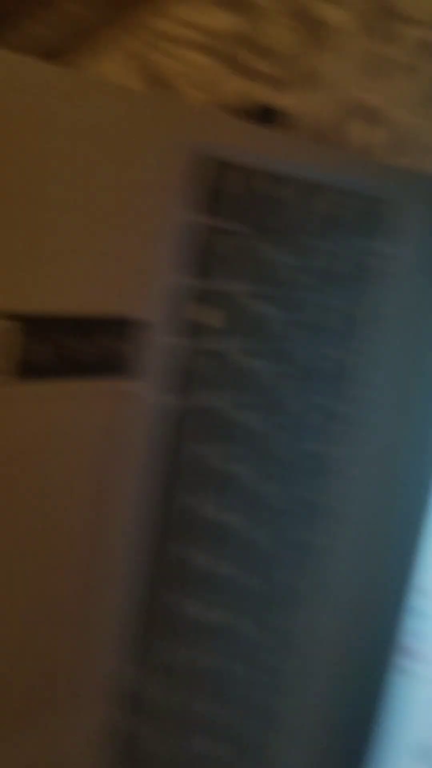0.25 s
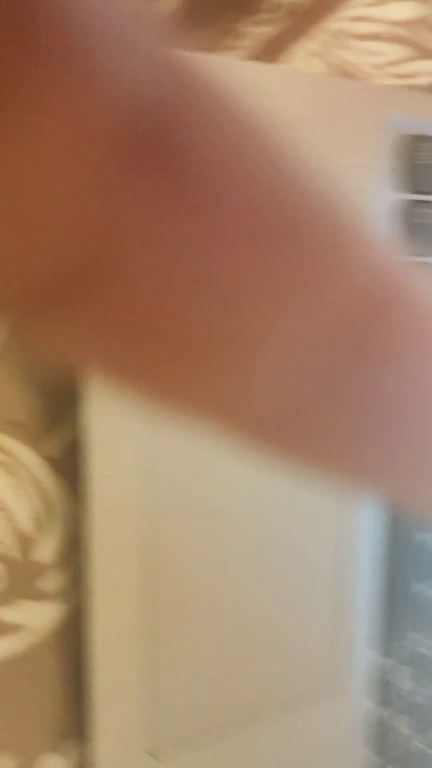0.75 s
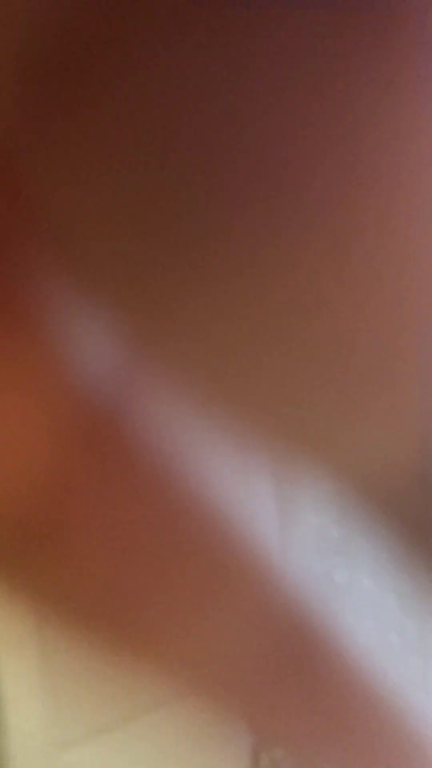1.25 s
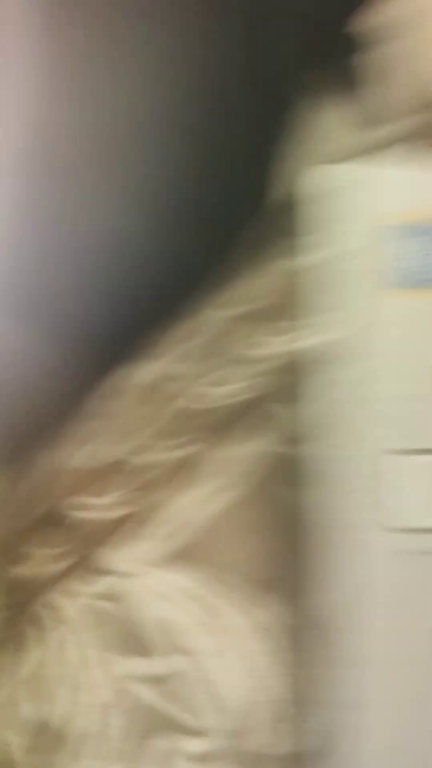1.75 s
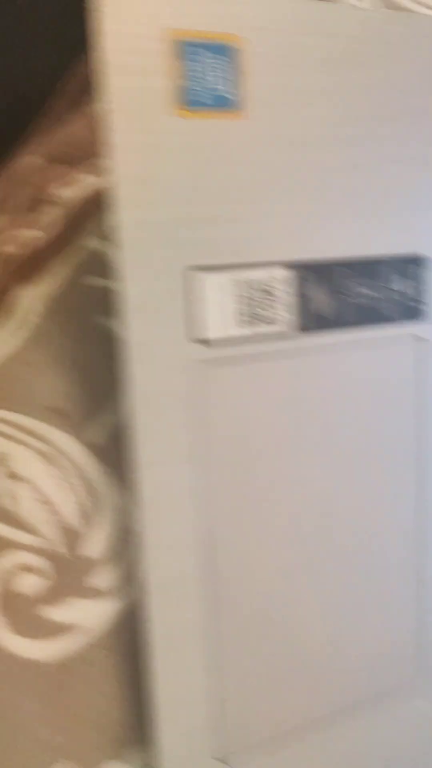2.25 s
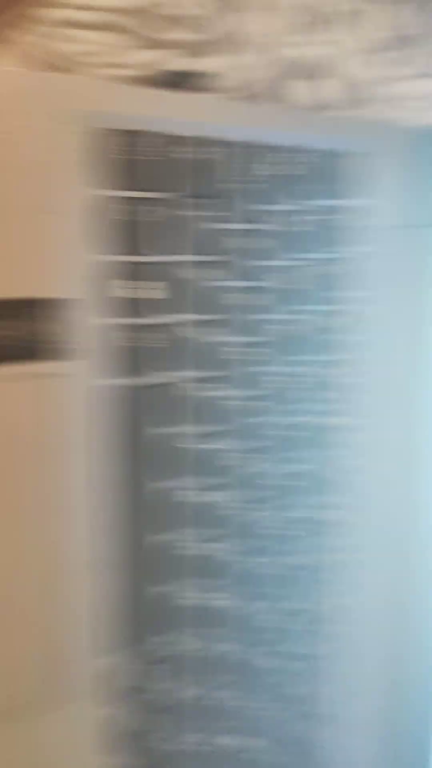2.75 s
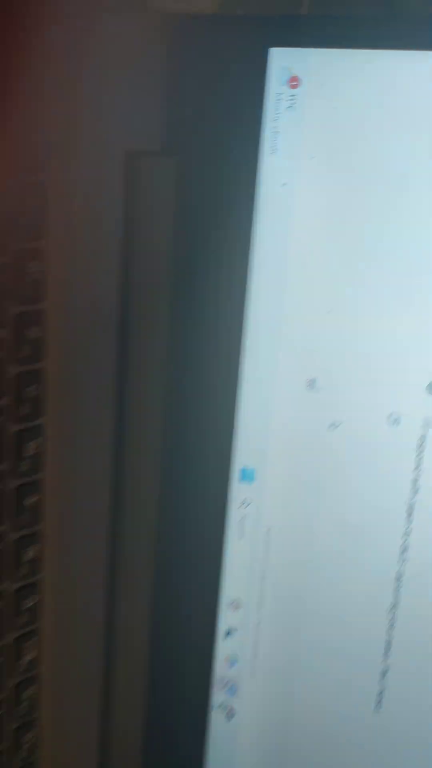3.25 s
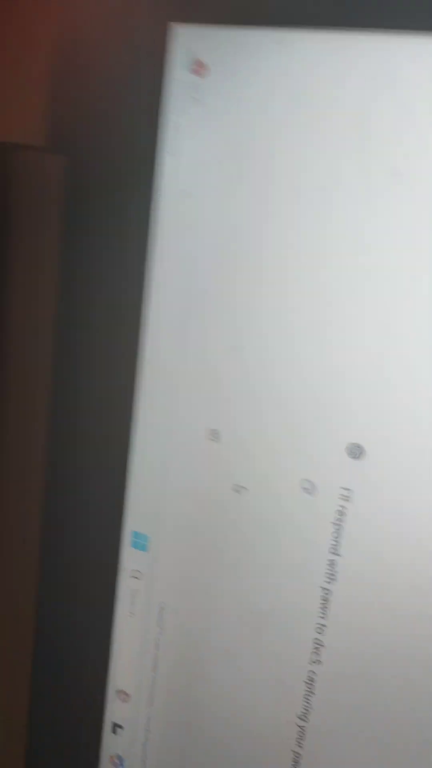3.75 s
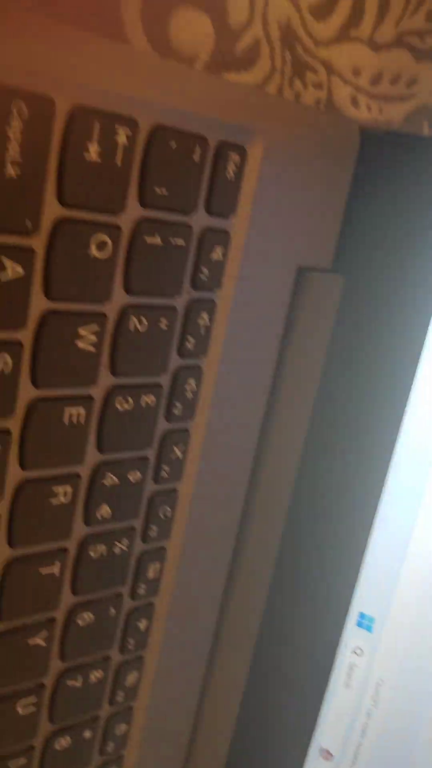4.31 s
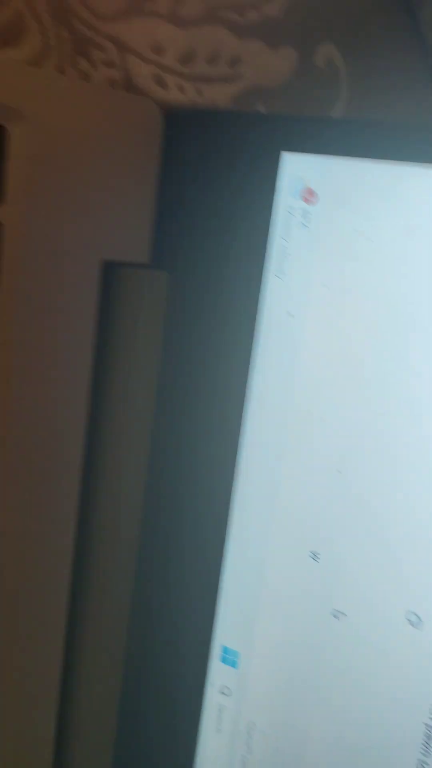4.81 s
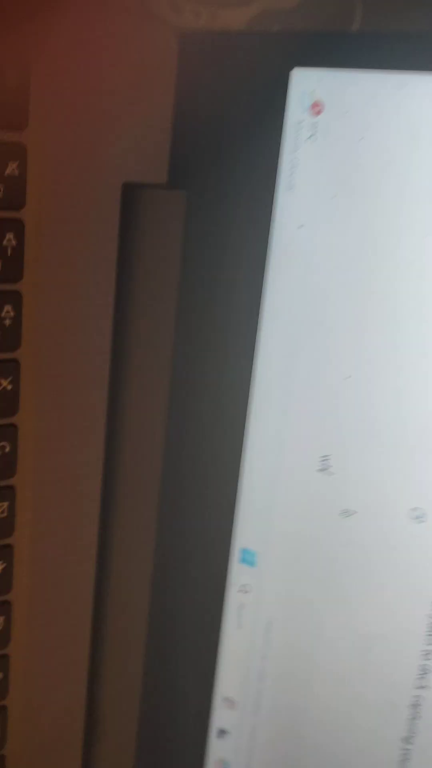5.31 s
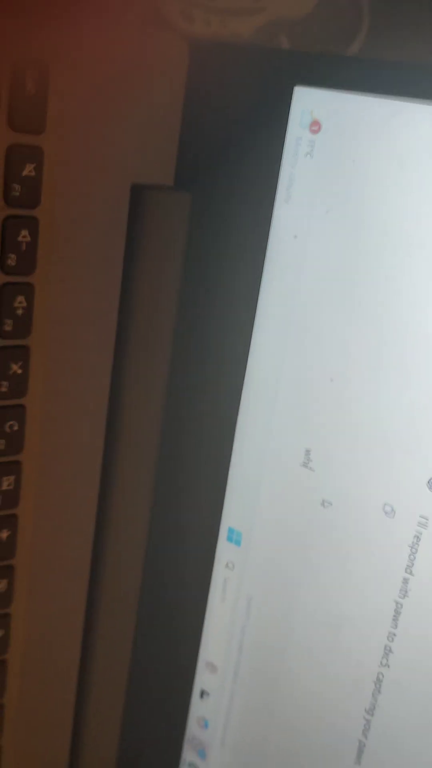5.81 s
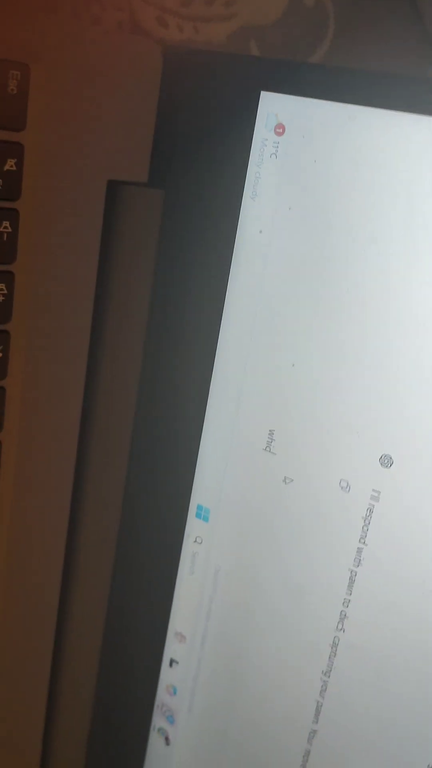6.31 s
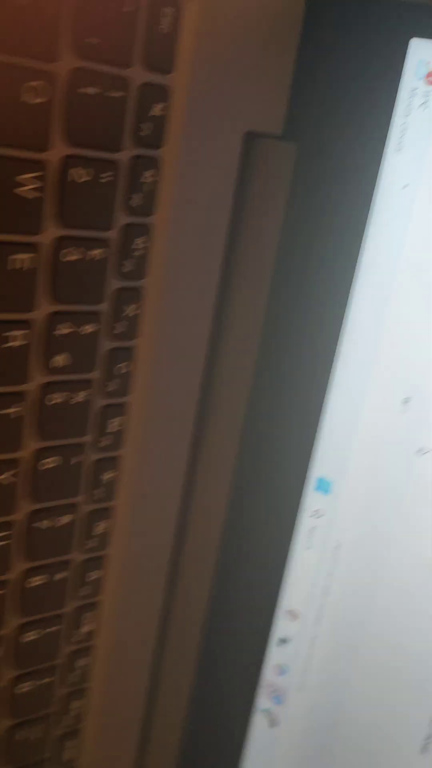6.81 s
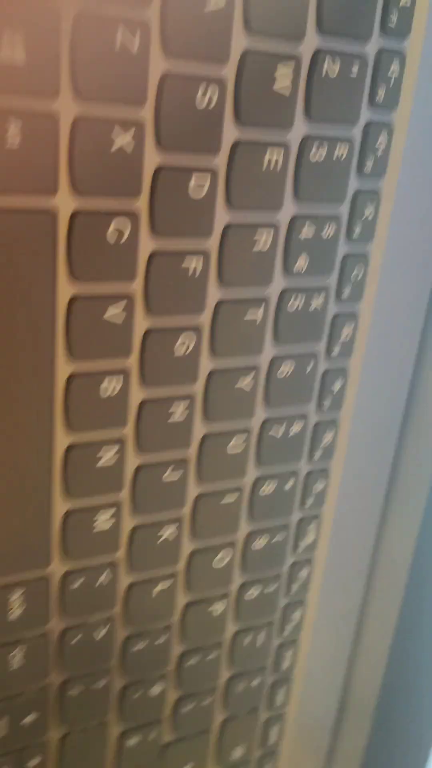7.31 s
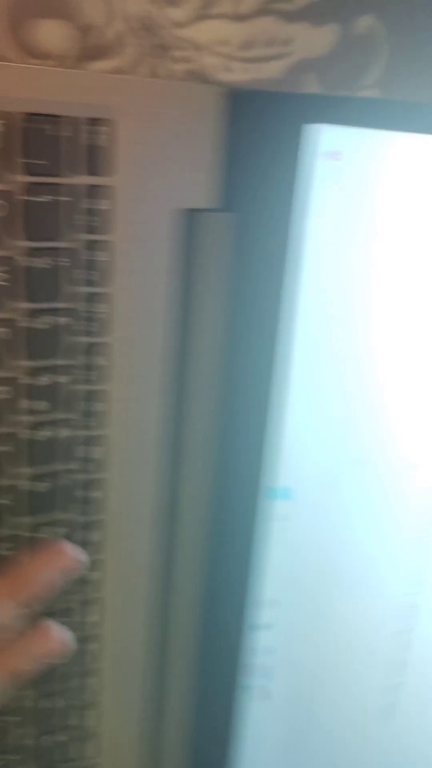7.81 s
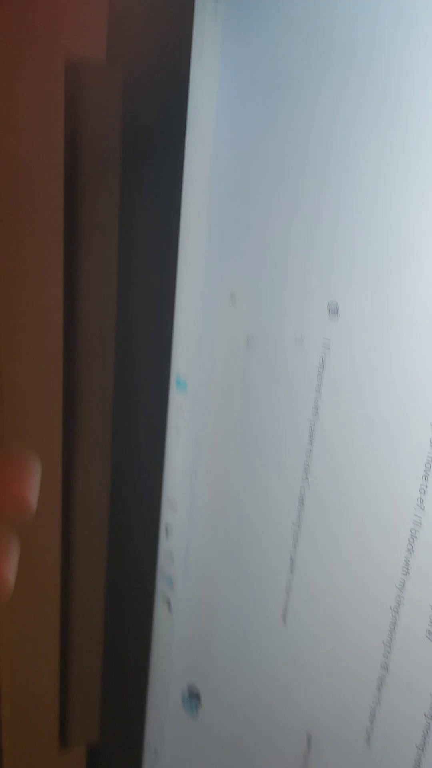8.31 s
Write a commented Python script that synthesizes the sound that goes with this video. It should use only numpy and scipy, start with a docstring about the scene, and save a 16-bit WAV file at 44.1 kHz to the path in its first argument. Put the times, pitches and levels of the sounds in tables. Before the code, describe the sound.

Fingers rub, snag and bump loudly against a handheld device, then sparse laptop keys click softly in a quiet room, ending with one hard stroke.

```python
"""Phone handling, then laptop typing

Fingers rub, snag and bump on a phone as it is brought round to a laptop in a quiet room. Then a few keys
are typed in short flurries, ending with one hard stroke. Skin is coloured stick-slip noise, snags are
sharp clicks and bumps are sagging low pushes; each key impact clicks in its plastic cap, clacks on the
deck and thuds through the chassis, and each release adds a falling thock."""
import sys
import numpy as np
from scipy import signal
from scipy.fft import rfft, irfft, next_fast_len
from scipy.io import wavfile

SR = 44100
rng = np.random.default_rng(int(sys.argv[2]) if len(sys.argv) > 2 else 0)


def inscribe(sig):
    """Save sig as 16-bit PCM at rate SR to the path in sys.argv[1].

    A 1-D sig is mono; a 2-D sig holds one channel per row.
    Samples are clipped to [-1, 1] before scaling.
    """
    pcm = np.round(np.clip(np.atleast_2d(sig).T, -1, 1) * 32767)
    wavfile.write(sys.argv[1], SR, pcm.astype(np.int16))


N = 377496
TIME = np.arange(N) / SR

# colour of a skin snag on the case: f/Hz, density/dB per Hz
SNAG_COLOUR = [(100, -37.5), (820, -30), (950, 3.5), (1500, 0), (2200, -2), (4200, -0.5), (5400, -19.5),
               (8500, -19), (11500, -29), (13500, -27.5), (16000, -37.5)]
# slips of a juddering, dragging finger: t/s
JUDDER_TIMES = [2.72, 2.783, 2.823, 2.846, 2.868, 2.891, 2.913, 2.928, 2.941]
# keystrokes: finger lands t/s, travel to the stop/s, held/s, then relative levels: landing click/dB,
# cap click at the stop/dB, deck clack/dB, release click/dB, release thock/dB; last, thock start f/Hz
KEYSTROKES = [(3.704, 0.0048, .13, -45, -40.5, -65, -46, -55.5, 607),
              (5.073, 0.0057, 0.065, -33, -36, -40, -41, -56, 650),
              (5.332, 0.0073, 0.069, -37, -47.5, -48.5, -39.5, -60, 600),
              (5.7853, .0057, 0.058, -30, -33.5, -37.5, -35, -53.5, 750),
              (6.520, 0.0034, .068, -31, -22, -20.5, -37.5, -46, 950),
              (6.658, .0068, 0.079, -34.5, -38, -39.5, -40.5, -43, 1087),
              (6.788, .01, .084, -41, -42.5, -51, -39, -41.5, 1210),
              (6.938, 0.0075, .083, -39.5, -34.5, -43, -41.5, -44, 1060),
              (7.098, 0.012, 0.069, -44, -37, -56.5, -43.5, -51, 940),
              (8.2033, .0046, .0605, -31, -14, -12.5, -34.5, -43.5, 565)]
LANDING_THUD_DB = -12  # a light finger hardly reaches the chassis; relative to its cap click


def gain_of(db):
    """Decibels to amplitude."""
    return 10 ** (np.asarray(db) / 20)


def evened(x):
    """Scales to rms 1."""
    return x / np.sqrt(np.mean(x ** 2) + 1e-20)


def add(mix, s, sound):
    """Mixes a sound in at time s, cut at the end of the mix."""
    part = mix[max(round(s * SR), 0):][:len(sound)]
    part += sound[:len(part)]


def colour(x, points, tilt_db=0):
    """Filters by a spectrum of (Hz, dB) points, tilted per octave above the second point."""
    f, db = np.transpose(points)
    octave = np.log2(np.fft.rfftfreq(len(x), 1 / SR) + 1)
    shape = np.interp(octave, np.log2(f), db)
    shape = shape + tilt_db * np.maximum(octave - np.log2(f[1]), 0)
    return irfft(rfft(x) * gain_of(shape), len(x))


def noise(points, size=N, tilt_db=0):
    """Coloured noise of rms 1."""
    white = rng.standard_normal(next_fast_len(size))
    return evened(colour(white, points, tilt_db)[:size])


def wobble(per_s):
    """Random drift of rms 1: straight lines between per_s chance values a second."""
    knots = rng.standard_normal(N // 16)
    return evened(np.interp(TIME * per_s, np.arange(len(knots)), knots))


def stick_slip(per_s, spread_db, smooth):
    """Countless tiny slips of uneven size over an even friction noise."""
    sizes = gain_of(spread_db * np.minimum(rng.exponential(1, N), 4))
    happens = rng.random(N) < per_s / SR
    slips = sizes * rng.choice([-1, 1], N) * happens
    return evened(evened(slips) + smooth * rng.standard_normal(N))


def background(floor_db=-72):
    """Faint steady room noise and a soft high hiss that drifts in level."""
    # room noise: f/Hz, density/dB per Hz
    floor_colour = [(20, -4), (45, 1), (90, 0), (150, -10), (300, -14.5), (500, -11), (750, -17),
                    (1000, -9), (2000, -17.5), (7000, -28), (12000, -21.5), (13500, -15.5), (16000, -19)]
    # hiss: f/Hz, density/dB per Hz
    hiss_colour = [(300, -23.5), (800, -14.5), (1100, -17.5), (2200, -16.5), (3200, -8.5), (4200, 1),
                   (5200, -3.5), (5900, -12), (6700, -26), (16000, -31.5)]
    # drift of the hiss: t/s, relative level/dB
    hiss_level = [(3.1, -63.5), (3.78, -64.5), (4.0, -71.5), (4.68, -70), (4.9, -65.5), (5.46, -74.5),
                  (5.78, -74), (5.91, -69.5), (6.59, -73.5), (6.72, -68.5), (7.29, -72.5), (8.35, -66.5),
                  (8.5, -70)]
    hiss_db = np.interp(TIME, *np.transpose(hiss_level)) + 3.5 + 0.75 * wobble(25)
    return gain_of(floor_db) * noise(floor_colour) + gain_of(hiss_db) * noise(hiss_colour)


def stroke_levels(rise_power=1.1, fall_power=2.4):
    """Rasp and skin hiss in dB: each stroke swells and eases off over the resting grip."""
    # the resting grip keeps rubbing: t/s, relative rasp level/dB, relative skin hiss level/dB
    grip = [(0, -55.5, -55), (.18, -60.5, -59.5), (.35, -67.5, -72), (.62, -59, -58), (.86, -58, -75),
            (1.3, -50.5, -61), (1.6, -56.5, -47.5), (1.7, -56.5, -55.5), (2.1, -66.5, -70.5),
            (2.45, -46.5, -68.5), (2.75, -52, -71), (2.98, -53.5, -69.5), (3.12, -73.5, -79)]
    # finger strokes: start t/s, rise/s, fall/s, then relative levels: rasp on the case/dB, skin hiss/dB
    strokes = [(0, 0.039, .05, -30, -43), (.056, .036, 0.042, -29, -31.5), (.39, .04, 0.065, -44, -52),
               (0.47, .011, .019, -19, -43), (.498, .014, .07, -22.5, -44.5),
               (.525, 0.063, .09, -20.5, -38.5), (.903, .017, .04, -30.5, -47),
               (0.931, 0.032, .06, -24, -36), (0.998, 0.11, .09, -45, -56), (1.17, 0.079, .13, -28, -39),
               (1.37, 0.029, .03, -35, -44), (1.41, 0.067, .07, -36.5, -51.5),
               (1.491, 0.034, .045, -23, -42), (1.53, 0.041, .06, -41.5, -38),
               (1.695, 0.06, .048, -38.5, -44.5), (1.8, 0.061, .17, -55, -52),
               (1.985, 0.029, .07, -52, -57), (2.126, .05, .07, -50, -47), (2.18, 0.027, .04, -33.5, -56.5),
               (2.235, 0.023, .07, -38, -54), (2.339, 0.012, .03, -26.5, -52),
               (2.37, 0.074, .1, -39.5, -66), (2.47, 0.042, .03, -38.5, -63),
               (2.536, 0.032, .14, -38.5, -60), (2.89, .07, .09, -45, -63.5)]
    s, *resting = np.transpose(grip)
    power = np.array([gain_of(np.interp(TIME, s, db, right=-120)) ** 2 for db in resting])
    for start, rise, fall, *levels in strokes:
        t = np.arange(0, rise + fall, 1 / SR)
        swell_in = np.sin(np.pi / 2 * np.minimum(t / rise, 1)) ** rise_power
        ease_off = np.cos(np.pi / 2 * np.clip((t - rise) / fall, 0, 1)) ** fall_power
        for layer, db in zip(power, levels):
            add(layer, start, (gain_of(db) * swell_in * ease_off) ** 2)
    return 10 * np.log10(power)


def sliding(rumble_db=-16, flutter_db=1.22, dull_below_db=24, bright_span_db=19, shimmer_db=2.5,
            catch_db=-8, catch_limit_db=-42):
    """Skin drags over the case: a thin grainy rasp with small catches, a wide hiss and a lumpy rumble."""
    # rasp on the case: f/Hz, density/dB per Hz
    rasp_colour = [(200, -47.5), (860, -44), (930, -4.5), (1050, 3.5), (1250, -3.5), (1500, -0.5),
                   (2200, -4), (3300, 0.5), (4400, -2), (5600, -24.5), (8000, -33), (16000, -42)]
    # skin hiss: f/Hz, density/dB per Hz
    skin_colour = [(40, -6), (300, -12), (830, -9.5), (1000, -1.5), (3000, -13.5), (5000, 3), (6800, -9),
                   (11000, -7), (14000, -8.5), (16000, -8)]
    rasp_db, skin_db = stroke_levels()

    slips = stick_slip(per_s=2600, spread_db=3.5, smooth=0.35)
    dull, bright = (evened(colour(slips, rasp_colour, tilt)) for tilt in (-5.5, 4))
    # the rasp brightens as the finger nears the microphone, where skin hiss gains on rasp
    nearness_db = skin_db - rasp_db + dull_below_db + shimmer_db * wobble(65)
    share = np.clip(nearness_db / bright_span_db, 0, 1)
    rasp = evened((1 - share) * dull + share * bright)
    rasp = rasp * gain_of(rasp_db + flutter_db * wobble(260) - 0.62)

    skin = evened(colour(stick_slip(per_s=6700, spread_db=0.0, smooth=1.8), skin_colour))
    skin = skin * gain_of(skin_db + 4.0 + 1.3 * wobble(90))

    rumble = noise([(20, -3.0), (55, 5), (110, -11), (220, -24), (500, -26), (3000, -78)])
    rumble = rumble * gain_of(rumble_db + 1.2 * wobble(25))
    rumble = rumble * gain_of(np.minimum(rasp_db, -37))  # follows the rasp up to a ceiling

    catches = evened(colour(stick_slip(per_s=45, spread_db=3.5, smooth=0), SNAG_COLOUR))
    catches = catches * gain_of(np.minimum(rasp_db, catch_limit_db) + catch_db)
    return rasp + catches + skin + rumble


def swishes(width_hz=200):
    """The palm brushes past: noise rings in the changing hollow under it, with a hiss on top."""
    # swishes: t/s, rise/s, fall/s, level/dB, hollow start f/Hz, glide/octaves per s, hiss over hollow/dB
    brushes = [(.003, 0.016, 0.021, -42.5, 561, -1, 6.5), (0.204, 0.012, 0.06, -47, 588, 1, 14),
               (1.245, 0.029, 0.04, -39, 327.5, -7, -20), (1.266, 0.051, 0.016, -34.5, 423.6, 10, -1),
               (1.473, 0.0035, 0.038, -43, 590, 4, -33)]
    # hiss on top: f/Hz, density/dB per Hz
    hiss_colour = [(400, -27.5), (1000, 0), (1800, -8), (2450, 7.5), (3100, -4), (4200, -4.5), (5000, 13.5),
                   (5800, 3.5), (6500, -5), (8000, -8), (11500, -8), (16000, -24)]
    out, t = np.zeros(N), np.arange(SR // 4) / SR
    smooth = signal.butter(2, width_hz / 2, fs=SR, output="sos")
    for s, rise, fall, db, hz, glide, hiss_db in brushes:
        # slow complex noise turned at the gliding pitch makes a band of noise around it
        turn = np.exp(2j * np.pi * np.cumsum(hz * 2 ** (glide * t)) / SR)
        slow = signal.sosfilt(smooth, [1, 1j] @ rng.standard_normal((2, len(t))))
        hollow = evened((turn * slow).real)
        swell = np.minimum(t / rise, 1) ** 2 * np.exp(-np.maximum(t - rise, 0) / fall)
        hiss = gain_of(hiss_db) * np.sqrt(swell) * noise(hiss_colour, len(t))
        add(out, s, gain_of(db) * swell * (hollow + hiss))
    return out


def snags(size=2048, scuff_db=-19, scuff_s=0.00092):
    """Single sharp slips, each smeared by a tiny scuff, carried through the case to the microphone."""
    # skin snags and case ticks: t/s, peak level/dB, tilt/dB per octave
    slips = [(.042, -10, 3.5), (.063, -6, 10.5), (0.4763, -6.5, -6), (.519, -1.5, 0.5), (.610, -4, -11.5),
             (.648, -16, -11), (.678, -18.5, 4.5), (0.686, -22.5, 1), (0.792, -35, 5), (.912, -11, .5),
             (.986, -8.5, 4), (1.010, -15.5, 1), (1.113, -22.5, -1.5), (1.186, -11, -2), (1.377, -19, 5),
             (1.434, -11.5, 7.5), (1.437, -15, -10), (1.508, -8, 1.5), (1.589, 3, 10.5), (2.194, -16.5, -3),
             (2.349, -11.5, -14.5), (2.394, -16.5, -4.5), (2.511, 4.5, -3), (2.655, -18, 0),
             (2.9139, -9, -8), (3.007, -21.5, 2.5), (3.577, -41, -3.5), (3.675, -36, -0.5),
             (3.775, -37.5, 2.5), (3.875, -38.5, 3), (4.699, -36, -6), (5.612, -42.5, 4)]
    # the tightening grip creaks in tiny high ticks: t/s, relative peak level/dB
    creaks = [(3.2184, -31), (3.3729, -32), (3.4177, -39), (3.4427, -34.5), (3.585, -23), (4.589, -44)]
    out, impulse = np.zeros(N), signal.unit_impulse(size, "mid")
    middle_s = size / 2 / SR
    scuff = gain_of(scuff_db - 2) * np.exp(-abs(np.arange(size) - size / 2) / SR / scuff_s)
    # each judder ticks 5 dB softer than the last
    judders = [(s, -23 - 5 * k, -5) for k, s in enumerate(JUDDER_TIMES)]
    for s, db, tilt in slips + judders:
        click = colour(impulse + scuff * rng.standard_normal(size), SNAG_COLOUR, tilt)
        add(out, s - middle_s, gain_of(db) * click / abs(click).max())
    tick = colour(impulse, [(1000, -20.0), (5000, -6), (12500, -22.5), (14500, 3), (16000, -2.0)])
    for s, db in creaks:
        add(out, s - middle_s, gain_of(db + 5.0) * tick / abs(tick).max())
    return out


def bumps(damping_per_hz=0.028, stiffening=0.56, soft_cycles=0.047):
    """Flesh meets the case: a cycle or two of low push that sags in pitch; tight bumps die fastest."""
    # soft bumps of the hand: t/s, peak level/dB, nominal f/Hz (the pitch sags from above it to below)
    hand_bumps = [(0.422, -32, 73), (.446, -39, 55), (.908, -39.5, 69), (1.029, -34.5, 152),
                  (1.175, -35.5, 61), (1.249, -30.5, 105), (1.347, -34.5, 65), (1.433, -28, 69),
                  (1.594, -33, 54.9), (1.726, -26, 75), (1.746, -19, 80), (1.907, -38.5, 58.3),
                  (2.037, -34, 58.5), (2.188, -31, 60.4), (2.246, -30.5, 76), (2.354, -33, 53.7),
                  (2.656, -30, 343), (3.005, -42.5, 100.6)]
    judder_db, judder_step_db, judder_hz, judder_sag_hz = -24.5, -1.22, 123, 2.9
    out, t = np.zeros(N), np.arange(SR // 8) / SR
    # each judder is weaker and a little lower than the last
    judders = [(s, judder_db + k * judder_step_db, judder_hz - k * judder_sag_hz)
               for k, s in enumerate(JUDDER_TIMES)]
    for s, db, hz in hand_bumps + judders:
        cycles = hz * t
        turns = .8 * cycles + stiffening * .5 * (1 - np.exp(-3 * cycles))
        fade = np.exp(-damping_per_hz * hz * cycles) * (1 - np.exp(-cycles / soft_cycles))
        push = -np.sin(2 * np.pi * turns) * fade
        add(out, s, gain_of(db) * push / abs(push).max())
    return out


def room(x, t60=0.3, gap_s=0.0064):
    """A small furnished room: a short diffuse tail of decaying noise after a gap."""
    t = np.arange(SR // 2) / SR
    tail = noise([(100, -4.5), (1000, -1.0), (5000, -9.5), (9000, -6), (16000, 10.0)], len(t))
    tail = tail * gain_of(-60 * t / t60) * np.clip(t / gap_s - 1, 0, 1)
    return signal.fftconvolve(x, tail / np.linalg.norm(tail))[:N]


def impacts():
    """A key is touched, hits its stop, rebounds, is let go and hits the top: (s, cap, deck, thud dB)."""
    # fingertips that tap a key without pressing it: t/s, relative cap click/dB, relative deck clack/dB
    taps = [(3.683, -45, -45.5), (6.824, -48, -43.5)]
    thud_base_db, thud_growth = -31.5, .28  # the thud grows by this share of the clack's dB
    landing_deck_db = -20  # relative to the landing click
    rebound_s, rebound_db = 0.012, -20.5  # the key bounces once on its stop
    release_deck_db, release_thud_db = -16, -1.5
    return_per_travel = 1.3  # the key springs back a little slower than it went down
    top_stop_db, top_thud_db = -1.5, -9
    for s, travel, held, landing_db, cap_db, deck_db, release_db, thock_db, _ in KEYSTROKES:
        stop = s + travel
        release = stop + held
        thud_db = thud_base_db + thud_growth * deck_db
        top_db = release_db + top_stop_db
        yield s, landing_db, landing_db + landing_deck_db, landing_db + LANDING_THUD_DB
        yield stop, cap_db, deck_db, thud_db
        yield stop + rebound_s, cap_db + rebound_db, deck_db + rebound_db, thud_db + rebound_db
        yield release, release_db, release_db + release_deck_db, thock_db + release_thud_db
        yield release + return_per_travel * travel, top_db, top_db + release_deck_db, top_db + top_thud_db
    for s, cap_db, deck_db in taps:
        yield s, cap_db, deck_db, cap_db + LANDING_THUD_DB


def burst(points, crack_s, rattle_db, rattle_s, tilt_db=0, rise_s=0.00065, size=6000):
    """Coloured noise for dense plastic modes: a crack, then the loose key's short rattle."""
    t = np.arange(size) / SR
    fade = np.exp(-t / crack_s) + gain_of(rattle_db) * np.exp(-t / rattle_s)
    return noise(points, size, tilt_db) * fade * (1 - np.exp(-t / rise_s))


def typing(detune=0.0895, scatter_db=2, hard_db=-30, tighten=0.91, brighten_db=0.18, bass_lag_s=0.0021):
    """Each impact sounds cap, deck and chassis; chance shifts pitch and level of the chassis modes."""
    # plastic cap click: f/Hz, density/dB per Hz
    cap_colour = [(1500, -51), (3800, -11), (5100, 7), (6000, 2), (6800, -3.5), (7800, 3), (8900, 0),
                  (10500, -15.5), (12000, -21.5), (14000, -18), (16000, -36)]
    # deck clack: f/Hz, density/dB per Hz
    deck_colour = [(150, 8.5), (400, -1), (900, -4.5), (1600, -1.5), (2100, 0.5), (2500, -0.5), (3100, 4.5),
                   (4200, 6), (5500, 4.5), (12000, -43)]
    # dull blow under the key: f/Hz, density/dB per Hz
    knock_colour = [(100, -2.5), (300, 0.5), (480, -1), (620, 0), (850, -5.5), (1100, -1.5), (1500, -22),
                    (5000, -40)]
    # slap of a key driven hard into its stop: f/Hz, level/dB
    slap_colour = [(400, -6), (1600, -6.5), (2200, -12), (3200, 6.5), (5000, -0.5), (10500, -48.5),
                   (13500, -9), (16000, -17)]
    # modes of the laptop's chassis: nominal f/Hz, mean level/dB, t60/s
    chassis = [(56.7, -7.5, 0.51), (112, -3.5, 0.26), (170.5, -5.5, 0.099), (224.4, -7.5, 0.14),
               (284.5, -1.5, 0.052), (366, -3, 0.059), (453, -8.5, 0.058), (541, -21, 0.041)]
    out, t = np.zeros(N), np.arange(SR // 3) / SR
    hz, mode_db, t60 = np.transpose(chassis)[:, :, None]
    slap = colour(signal.unit_impulse(512, 24), slap_colour)[:256]
    slap = slap / abs(slap).max()
    for s, cap_db, deck_db, thud_db in impacts():
        # only a hard blow slaps, and its crack stands further above the rattle
        force = max(cap_db - hard_db, 0)
        looser_db = -tighten * force
        cap = burst(cap_colour, crack_s=0.0012, rattle_db=-17 + looser_db, rattle_s=0.014)
        deck = burst(deck_colour, crack_s=0.0012, rattle_db=-13.5 + looser_db, rattle_s=0.028,
                     tilt_db=brighten_db * force)
        knock = burst(knock_colour, crack_s=0.0028, rattle_db=-17 + looser_db, rattle_s=0.015)
        add(out, s, gain_of(cap_db - 16.5) * force * slap)
        add(out, s, gain_of(cap_db + 4.5) * cap)
        add(out, s, gain_of(deck_db + 2.0) * deck)
        add(out, s, gain_of(thud_db + 2) * knock)

        shift, weight = rng.standard_normal((2, len(hz), 1))
        ringing = gain_of(mode_db + scatter_db * weight - 60 * t / t60)
        modes = ringing * np.sin(2 * np.pi * hz * (1 + detune * shift) * t)
        thud = rng.choice([-1, 1], len(hz)) @ modes
        add(out, s + bass_lag_s, gain_of(thud_db - 3.0) * thud)
    return out


def thocks(rise_s=0.0025, decay_s=0.01, glide_s=0.00614, end_share=0.31, trim_db=0.5):
    """The chassis springs back as a key is let go: bending waves, highs first, make a falling note."""
    out, t = np.zeros(N), np.arange(SR // 20) / SR
    glide = np.cumsum(end_share + (1 - end_share) * np.exp(-t / glide_s)) / SR
    fade = (1 - np.exp(-t / rise_s)) * np.exp(-t / decay_s)
    for s, travel, held, *_, thock_db, hz in KEYSTROKES:
        note = fade * np.sin(2 * np.pi * hz * glide)
        add(out, s + travel + held, gain_of(thock_db + trim_db) * note)
    return out


def shuffles():
    """Small soft scuffs of swelling noise as the holding hand settles."""
    # shuffles of the grip: t/s, length/s, level at the height of the swell/dB
    scuffs = [(4.427, .067, -69), (4.659, 0.071, -61.5), (7.324, .05, -65), (7.857, .04, -69.5)]
    points = [(200, -3), (800, -3), (1000, 3), (1800, 4.0), (4000, -10), (8000, -22)]
    out = np.zeros(N)
    for s, length, db in scuffs:
        size = int(length * SR)
        add(out, s, gain_of(db) * signal.windows.hann(size) * noise(points, size))
    return out


def scene():
    """The rubbing is dry; the keys and a little of the bumps also reach the microphone through the room."""
    keys, thumps = typing() + thocks(), bumps()
    handling = sliding() + snags() + thumps + swishes() + shuffles()
    reverb = room(gain_of(-7.5) * keys + gain_of(-13) * thumps)
    return (handling + keys + reverb + background())[None]


def record(dry, edge_hz=16000):
    """Peaks beyond full scale clip; then a steep low-pass limits the band."""
    low_pass = signal.firwin(511, edge_hz, window=("kaiser", 9), fs=SR)
    return signal.oaconvolve(np.clip(dry, -1, 1), low_pass[None], "same")


dry = scene()
out = record(dry)
inscribe(out)
```